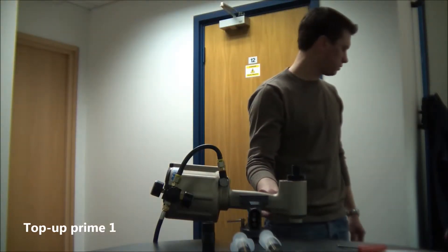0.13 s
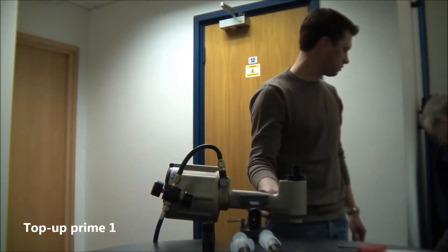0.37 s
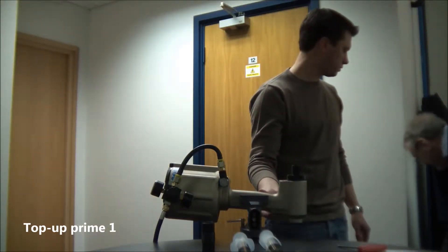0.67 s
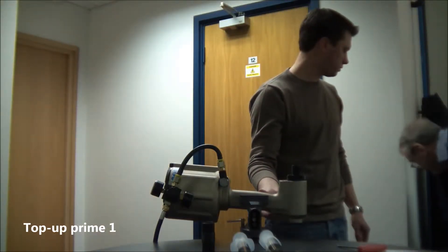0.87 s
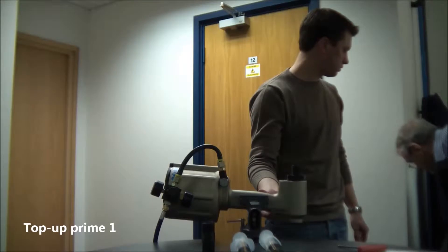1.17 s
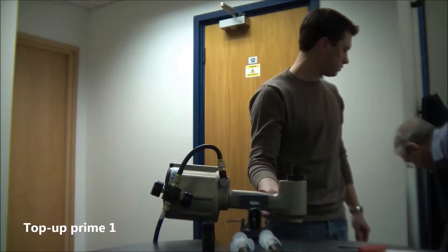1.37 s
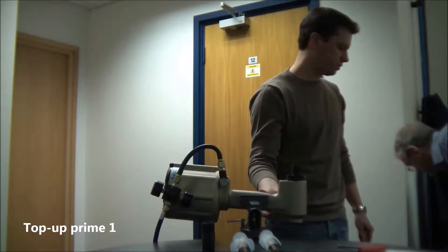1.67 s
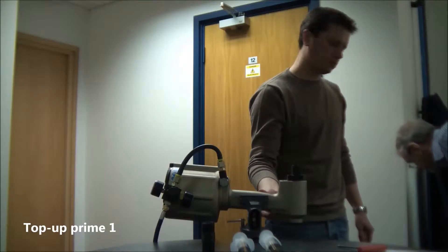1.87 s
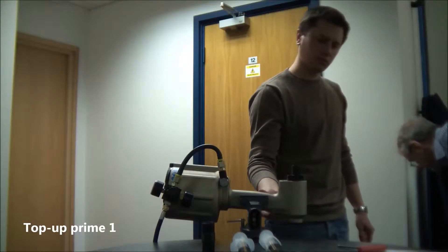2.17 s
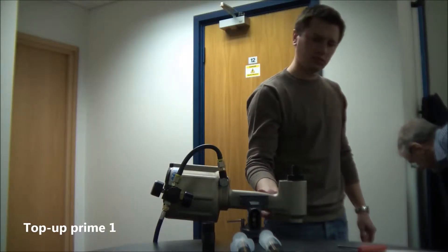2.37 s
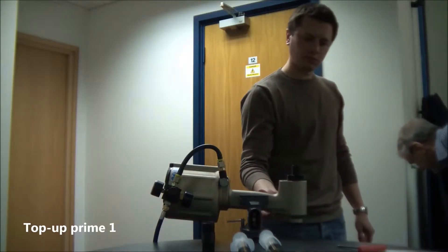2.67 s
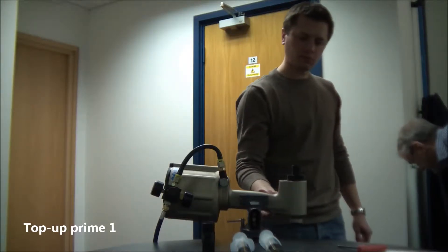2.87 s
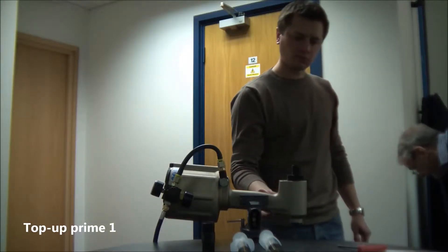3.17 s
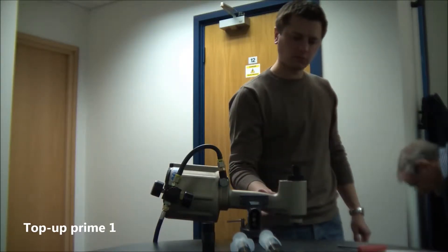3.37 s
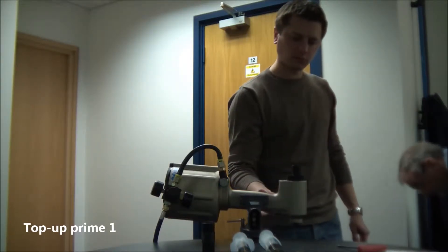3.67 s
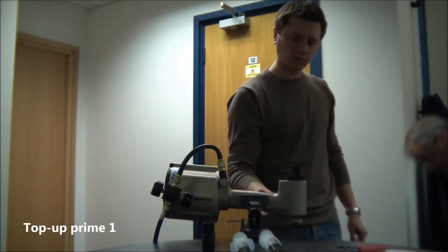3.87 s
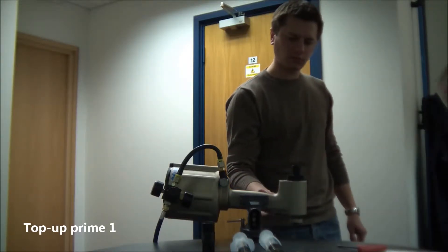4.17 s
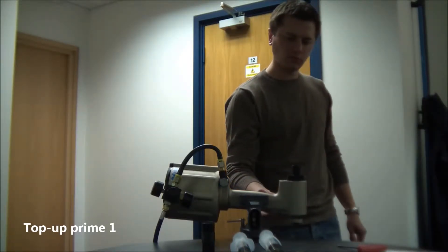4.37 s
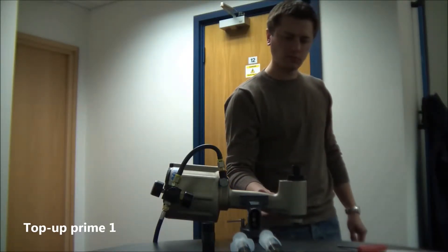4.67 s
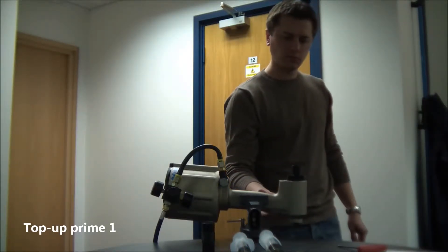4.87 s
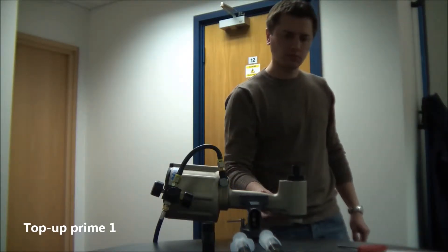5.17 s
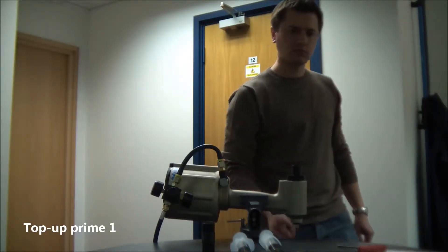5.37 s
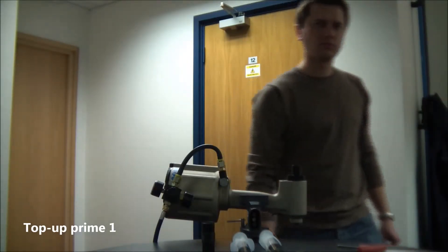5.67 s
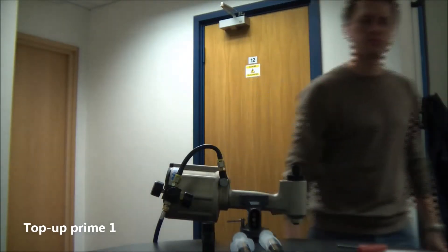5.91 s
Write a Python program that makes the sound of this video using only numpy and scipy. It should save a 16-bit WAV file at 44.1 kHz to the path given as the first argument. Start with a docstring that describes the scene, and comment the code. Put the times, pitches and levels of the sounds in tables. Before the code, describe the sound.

A steady, high leak hisses from a pneumatic tool right at a stereo microphone, until a sudden burst of air thumps out and distorts. The escaping air sputters and weakens, its tone climbing as the line empties. A metal part gives short singing rubs and one ringing clank, followed by light clicks over the low hum of a small room.

```python
"""A small office with a mains hum, and a stereo microphone on a pneumatic tool that hisses through a leak.
At 1.4 s the valve flies open and one blast of air overloads the microphone; the gain control turns
down, and the hum sinks with it. The air line drains in a fading, spluttering hiss whose resonance climbs.
From 3.5 s rubs make a metal part sing; at 4.2 s it clanks and rings. Faint handling clicks come last."""
import sys
import numpy as np
from scipy import signal
from scipy.fft import rfft, irfft, next_fast_len
from scipy.io import wavfile
from scipy.ndimage import uniform_filter1d

SR = 44100
rng = np.random.default_rng(int(sys.argv[2]) if len(sys.argv) > 2 else 0)


def master(y):
    """Save y as 16-bit WAV."""
    cut = np.clip(np.atleast_2d(y).T, -1, 1)
    pcm = np.round(cut * 32767)  # scale
    wavfile.write(sys.argv[1], SR, pcm.astype(np.int16))


N = 266476
TIME, FFT_SIZE = np.arange(N) / SR, next_fast_len(N, True)
ALL_HZ = np.fft.rfftfreq(FFT_SIZE, 1 / SR)
FRAME_S, BIN_HZ = np.arange(N // 256 + 5)[:, None] * 256 / SR, np.fft.rfftfreq(1024, 1 / SR)
CRACK_S, OPEN_S = 1.365, 1.411  # the valve cracks, then flies open
SINCE_OPEN_S = np.maximum(TIME - OPEN_S, 0)

# The office's reverberation. Each row: frequency in Hz, seconds to fall 60 dB.
ROOM_DECAY = [(100, 0.59), (1000, 0.38), (4000, 0.3), (12000, 0.14)]
# Steady tones in the room. Each row: frequency in Hz, level in dB.
HUM_TONES = [(80.7, -47.5), (99.9, -39.5), (199.5, -51), (349.5, -51.5), (399, -59), (602.5, -59.5),
             (883, -68), (2046, -67.5)]
# The colour of each noise. Each row: frequency in Hz, relative spectral density in dB.
ROOM_TONE_SPECTRUM = [(12, -34.5), (20, 0.5), (49, -13), (103, -9.5), (132, -18), (199, -17.5),
                      (319, -25.5), (347, -23), (540, -24), (587, -27), (1020, -28), (1170, -30),
                      (15000, -46)]
RATTLE_SPECTRUM = [(50, -6), (180, -8), (400, -6), (900, -1), (1800, -6.5), (3600, -8.5), (7000, -18),
                   (14000, -50)]
LEAK_SPECTRUM = [(300, -21), (1000, -18.5), (1800, -16), (2400, -11.5), (2950, -2), (3350, 1), (3750, -0.5),
                 (4600, -9.5), (6400, -14), (9200, -14), (13000, -13.5), (15300, -17)]
DRAIN_SPECTRUM = [(100, -25), (280, -20), (480, -11), (620, -7.5), (900, -5.5), (1400, -4), (1650, -1),
                  (2500, -0.5), (2950, -1), (3550, -2.5), (4300, -5), (6000, -7), (8500, -14), (11000, -12),
                  (15000, -23.5)]
BLAST_SPECTRUM = [(29, -40), (50, -7), (124, -1), (362, -7), (439, -3.5), (613, -4), (1010, -15.5),
                  (1090, -11), (1790, -6), (1930, -9), (2220, 2.5), (2820, -12.5), (4440, 0), (15000, -14)]
# Stereo width at the microphone. Each row: frequency in Hz, gain of the side signal in dB.
ROOM_TONE_WIDTH = [(30, -10), (110, -13.5), (400, -20.5), (900, -19), (1700, -3), (3400, -7), (7000, -0.5)]
TOOL_WIDTH = [(30, -16), (130, -23), (400, -20), (1400, -16), (2800, -12.5), (5500, -4.8), (9000, -1.7),
              (14000, -1.1)]
LEAK_WIDTH = [(1000, -50), (3300, -22.5), (4600, -13), (6000, -2.5), (10000, -3)]  # its middle range arrives straight from the gap
# The lean of room tone and hum. Each row: frequency in Hz, left against right in dB.
BACKGROUND_BALANCE = [(40, -3.5), (100, -1.3), (400, -.5), (900, 0.5)]
# Handling clicks and squeaks. Each row: start in seconds, level in dB, centre in Hz, spread in octaves.
HANDLING_CLICKS = [(.598, -35.5, 700, 1.2), (4.217, -35, 250, 0.96), (5.311, -45, 3000, 0.91),
                   (5.372, -47, 3400, .23), (5.407, -42, 3200, .17), (5.435, -44, 1300, .16),
                   (5.485, -45, 10000, .08), (5.533, -43.5, 6500, .62), (5.99, -39, 1160, .2)]
# Rubs on the metal part. Each row: start in seconds, length in seconds, level in dB.
METAL_RUBS = [(3.47, 0.089, -42), (4.06, .12, -47.5), (4.236, .028, -31.5), (4.29, 0.061, -29),
              (4.5, 0.015, -49)]
# Modes of the struck part. Each row: frequency in Hz, relative level in dB, seconds to fall 60 dB.
METAL_MODES = [(888, -13, .5), (1021, -13, .4), (1112, -15, .4), (1539, -11, .33), (1914, -16, 1.2),
               (2374, -19, .55), (2589, -19, .55), (2853, -17, .55), (3057, -13, .5), (3117, -16, .5),
               (3556, -13, .42), (3905, -17, .45), (4036, -13, .35), (4075, -15, .32), (4775, -14, .38),
               (5120, -22, .45), (5459, -19, .38), (6600, -19, .15), (9050, -24, .2), (10150, -25, .15)]
# Resonances of the leaking gap and of the tool's air passages.
# Each row: frequency in Hz, width in Hz, full lift in dB.
GAP_MODES = [(5500, 420, 6.5), (6820, 400, 5), (10650, 750, 8.5), (14800, 900, 7.5)]
PASSAGE_MODES = [(610, 40, 5), (1220, 50, 3), (1560, 40, 3), (1654, 25, 6), (1800, 70, 7), (1890, 15, 4),
                 (2027, 20, 4), (2216, 30, 3), (2280, 22, 5), (2615, 30, 3), (2710, 30, 3), (3480, 500, 3),
                 (4424, 25, 5), (5200, 25, 6)]
# Short gushes, thin whistles and low rumbles, most of them air from the spluttering outlet. Each row: start in
# seconds, length in seconds, level in dB, centre in Hz, spread in octaves.
SPURTS = [(0.325, 0.18, -43, 450, 0.1), (1, .45, -38, 169, .78), (1.016, 0.13, -35, 1100, .88),
          (2.29, 0.078, -17, 1020, 0.48), (2.333, 0.11, -23, 9500, .28), (2.363, 0.18, -21, 6570, .05),
          (2.277, 0.33, -18.5, 3520, .07), (2.464, 0.17, -29, 81, 0.47), (2.563, 0.15, -21, 370, 0.72),
          (2.642, 0.13, -22, 5260, 0.22), (2.751, .2, -26, 500, .36), (3.006, 0.19, -24.5, 1980, 0.41),
          (3.042, 0.66, -37, 430, 1.05), (3.52, 0.24, -30, 5330, .32), (3.531, .18, -30, 9350, .17)]
# The draining flow slackens twice. Each row: start in seconds, length in seconds, drop in dB.
FLOW_DROPS = [(2.74, 0.11, 4), (3.72, 0.13, 3.5)]
# The outlet's resonance as the pressure falls. Each row: time in seconds, frequency in Hz, lift in dB.
OUTLET_GLIDE = [(1.55, 2230, 4.5), (1.72, 1950, 3), (1.99, 1760, 9.5), (2.07, 2400, 8.5), (2.22, 2400, 5),
                (2.53, 2550, 6), (2.59, 3400, 5.5), (3.0, 3450, 1), (3.28, 3500, 8.5)]


def amp(db):
    """Decibels to gain."""
    return 10 ** (np.asarray(db) / 20)


def unit_rms(x):
    """Scales to rms 1."""
    return x / np.sqrt(np.mean(abs(x) ** 2) + 1e-20)


def curve(points, hz=ALL_HZ):
    """Interpolates a table on a log-frequency axis."""
    f, value = np.transpose(points)
    return np.interp(np.log(hz + 1), np.log(f + 1), value)


def lift(modes):
    """The dB that resonances add to a spectrum."""
    return sum(db / (1 + (2 * (ALL_HZ - hz) / width) ** 2) for hz, width, db in modes)


def tint(x, db):
    """Filters by a dB value for each frequency."""
    return irfft(rfft(x, FFT_SIZE) * amp(db), FFT_SIZE)[:N]


def noise(db):
    """Noise of rms 1 with the given spectrum."""
    return unit_rms(tint(rng.standard_normal(N), db))


def band(hz, octaves):
    """Noise of rms 1 in a bell around one frequency."""
    away = np.log2((ALL_HZ + 1) / hz) / octaves
    return noise(-30 * np.log10(1 + away ** 2 / 6))


def wander(rate_hz):
    """Slow random movement of rms 1."""
    return noise(-20 * np.log10(1 + (ALL_HZ / rate_hz) ** 2))


def envelope(start, rise_s, length, fall_db_per_s):
    """Attack, hold until the length is over, then a steady fall in dB."""
    age = TIME - start
    return np.clip(age / rise_s, 0, 1) * amp(-fall_db_per_s * np.maximum(age - length, 0))


def office(x):
    """Dense reflections off the near walls of a small room, each band dying at its own speed."""
    hz, age, spectra = signal.stft(rng.standard_normal(SR // 2), SR, nperseg=256)
    decay = amp(-60 * age / curve(ROOM_DECAY, hz)[:, None])
    tail = signal.istft(spectra * decay, SR, nperseg=256)[1]
    return signal.fftconvolve(x, tail / np.linalg.norm(tail))[:N]


def room_tone(level_db=-38):
    """The office's steady noise around the microphone, mostly low rumble."""
    return amp(level_db) * noise(curve(ROOM_TONE_SPECTRUM))


def hum(waver_db=0.4):
    """Mains hum and fan tones, wavering a little in level."""
    return sum(amp(db + waver_db * wander(8.3)) * np.sqrt(2)
               * np.sin(2 * np.pi * (hz * TIME + rng.random())) for hz, db in HUM_TONES)


def clicks(rise_s=0.0035, t60=0.23):
    """Light touches on the tool, too soft to make it ring."""
    return sum(amp(db) * band(hz, octaves) * envelope(start, rise_s, 0, 60 / t60)
               for start, db, hz, octaves in HANDLING_CLICKS)


def singing(hz=731, rise_s=0.021, fall_db_per_s=300, linger_db=-17, linger_db_per_s=55, chatter_db=2.5):
    """Each rub feeds the metal's lowest mode, which drops quickly and then lingers faintly."""
    swell = np.zeros(N)
    for start, length, db in METAL_RUBS:
        rubbed = envelope(start, rise_s, length, fall_db_per_s)
        lingering = amp(linger_db) * envelope(start, rise_s, length, linger_db_per_s)
        swell += amp(db) * (rubbed + lingering)
    return swell * amp(chatter_db * wander(40)) * np.sqrt(2) * np.sin(2 * np.pi * hz * TIME)


def clank(start_s=4.228, rise_s=0.0067, rattle_db=-26, rattle_t60=0.51, ring_db=-20, db_per_octave=1.0):
    """The struck metal part gives a short rattle and rings in its modes."""
    age = np.maximum(TIME - start_s, 0)
    ring = np.zeros(N)
    for hz, db, t60 in METAL_MODES:
        bright_db = db_per_octave * np.log2(hz / 2000)  # hard contact favours the upper modes
        ring += amp(db + bright_db - 60 * age / t60) * np.sin(2 * np.pi * (hz * age + rng.random()))
    rattle = noise(curve(RATTLE_SPECTRUM)) * amp(-60 * age / rattle_t60)
    return np.minimum(age / rise_s, 1) * (amp(rattle_db) * rattle + amp(ring_db) * ring)


def leak(level_db=-27, fall_db_per_s=54, flutter_db=0.55):
    """Air squeezes through a narrow gap; once the valve opens, the hiss dies with the pressure."""
    hiss = noise(curve(LEAK_SPECTRUM) + lift(GAP_MODES))
    return hiss * amp(level_db - fall_db_per_s * SINCE_OPEN_S + flutter_db * wander(25))


def spurts(rise_s=0.018, fall_s=0.13, sputter_db=0.16):
    """Short uneven gushes and rumbles, mostly of air, each with its own pitch."""
    gushes = np.zeros(N)
    for start, length, db, hz, octaves in SPURTS:
        opening = np.clip((TIME - start) / rise_s, 0, 1)
        closing = np.clip((start + length - TIME) / fall_s + 0.5, 0, 1)
        gushes += amp(db) * opening * closing * band(hz, octaves)
    return gushes * amp(sputter_db * wander(66))


def line_flow(level_db=-3.5, rise_s=0.092, fall_db_per_s=10.5, sag_db_per_s2=1.13):
    """Strength of the draining air: it falls ever faster, with a further drop at each slackening."""
    spent_db = fall_db_per_s * SINCE_OPEN_S + sag_db_per_s2 * SINCE_OPEN_S ** 2
    slack_db = sum(db * np.clip((TIME - start) / length, 0, 1) for start, length, db in FLOW_DROPS)
    return np.minimum(SINCE_OPEN_S / rise_s, 1) * amp(level_db - spent_db - slack_db)


def drain(patchy_db=0.93, flutter_db=0.72, tilt_db=1.5, knee_hz=3500, outlet_octaves=0.18, strong_db=-11):
    """The emptying line: the hiss weakens while the outlet's resonance dips, then climbs."""
    times, *columns = np.transpose(OUTLET_GLIDE)
    outlet_hz, lift_db = (np.interp(FRAME_S, times, column) for column in columns)
    outlet_db = lift_db / (1 + (np.log2((BIN_HZ + 1) / outlet_hz) / outlet_octaves) ** 2)
    treble_db = tilt_db * np.log2(1 + (BIN_HZ / knee_hz) ** 2) / 2
    real, imag, patches = rng.standard_normal((3, len(FRAME_S), len(BIN_HZ)))
    # the colour flickers in patches of time and frequency
    patches = unit_rms(uniform_filter1d(uniform_filter1d(patches, size=10, axis=0), size=14, axis=1))
    jet = (real + 1j * imag) * amp(curve(DRAIN_SPECTRUM, BIN_HZ))
    coloured_jet = jet * amp(treble_db + patchy_db * patches + outlet_db)
    plain, coloured = (signal.istft(z.T, nperseg=1024, noverlap=768)[1][:N] for z in (jet, coloured_jet))
    hiss, flow = coloured / plain.std(), line_flow()
    ringing = np.clip(flow / amp(strong_db), 0, 1)  # the passages ring while the flow is strong
    hiss = hiss + ringing * (tint(hiss, lift(PASSAGE_MODES)) - hiss)
    return hiss * flow * amp(flutter_db * wander(23))


def blast(crack_db=-21, open_db=2, fall_db_per_s=207, push_hz=170, push_t60=0.074,
          thump_db=-2, thump_hz=76, thump_t60=0.086):
    """The valve cracks, then opens: a pressure thump and a low push of air under a full wide roar."""
    cracked = amp(crack_db) * envelope(CRACK_S, 0.018, OPEN_S - CRACK_S, fall_db_per_s)
    opened = amp(open_db) * envelope(OPEN_S, rise_s=0.016, length=0.099, fall_db_per_s=fall_db_per_s)
    roar = noise(curve(BLAST_SPECTRUM) + 0.5 * lift(PASSAGE_MODES)) * (cracked + opened)
    thump = np.sin(2 * np.pi * thump_hz * SINCE_OPEN_S) * amp(thump_db - 60 * SINCE_OPEN_S / thump_t60)
    push = band(push_hz, octaves=1.6) * (TIME > OPEN_S) * amp(-60 * SINCE_OPEN_S / push_t60)
    return roar + thump + push


def scene(air_wet_db=-7, metal_wet_db=-13):
    """At the microphone the bass is nearly mono; the jet's eddies give each side partly unrelated treble."""
    air, air_side = (blast() + drain() + spurts() for _ in range(2))
    room, room_side = room_tone(), room_tone()
    metal = clank() + clicks()
    background = room + hum()
    air = air + leak()
    mid = (air + amp(air_wet_db) * office(air)) / np.hypot(1, amp(air_wet_db))
    mid += metal + amp(metal_wet_db) * office(metal) + singing()
    side = tint(air_side + office(metal), curve(TOOL_WIDTH))
    side += tint(leak(), curve(LEAK_WIDTH)) + tint(room_side, curve(ROOM_TONE_WIDTH))
    lean_db = curve(BACKGROUND_BALANCE) / 2
    return np.array([mid + side + tint(background, lean_db), mid - side + tint(background, -lean_db)])


def record(dry, threshold_db=-21, share=0.58, range_db=11, lag_s=0.071, ceiling=0.96, cutoff_hz=15350):
    """The microphone's slow gain control lets the blast clip before it turns down; a low-pass follows."""
    power_db = 10 * np.log10(abs(uniform_filter1d((dry ** 2).mean(0), size=600)) + 1e-12)
    wanted_db = np.clip(share * (power_db - threshold_db), 0, range_db)
    pole = np.exp(-1 / (lag_s * SR))
    duck_db = signal.lfilter([1 - pole], [1, -pole], wanted_db)
    clipped = np.clip(dry * amp(-duck_db), -ceiling, ceiling)
    low_pass = signal.firwin(511, cutoff_hz, window=("kaiser", 9), fs=SR)
    return signal.oaconvolve(clipped, low_pass[None], "same")


dry = scene()
out = record(dry)
master(out)
```